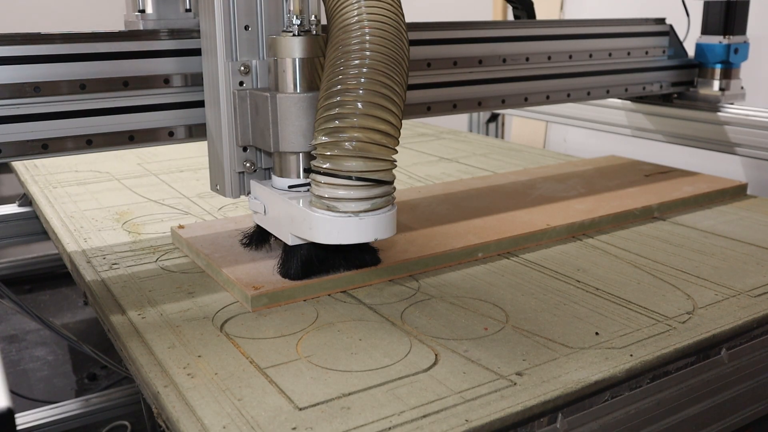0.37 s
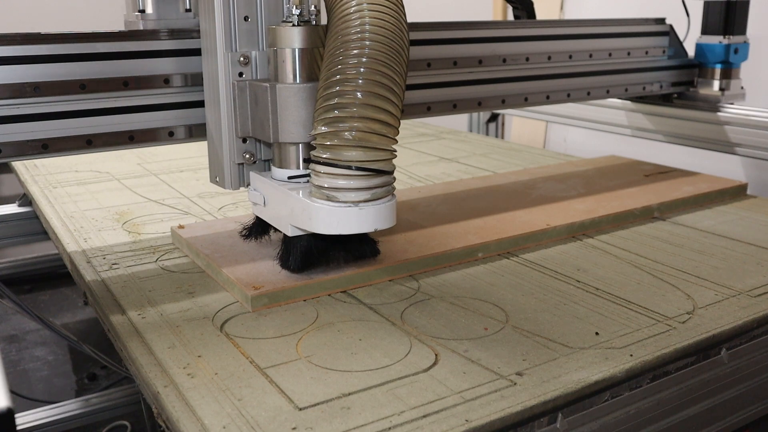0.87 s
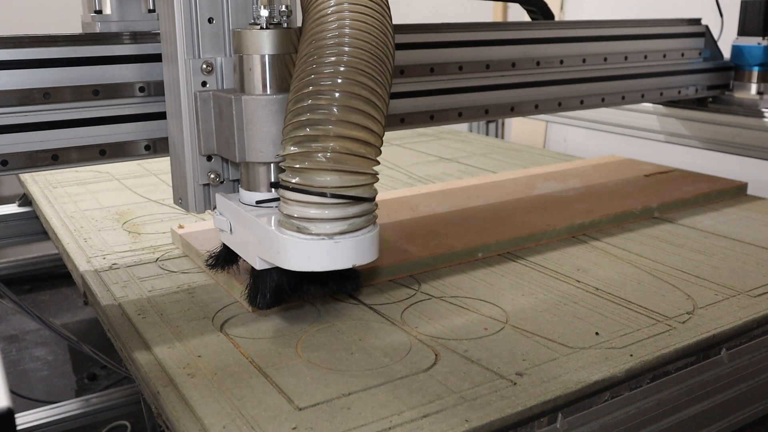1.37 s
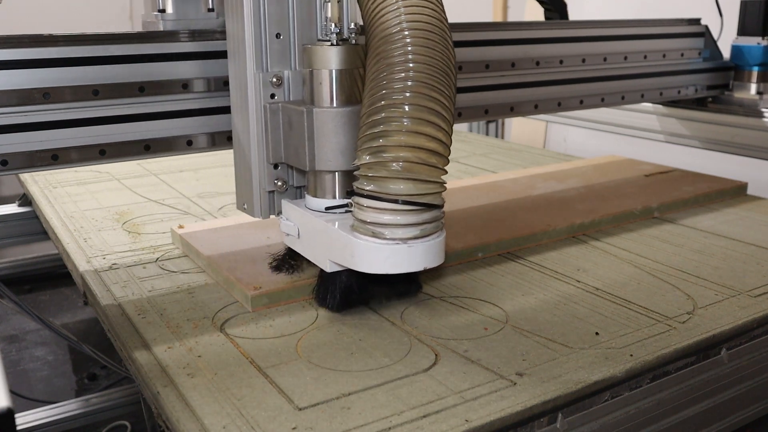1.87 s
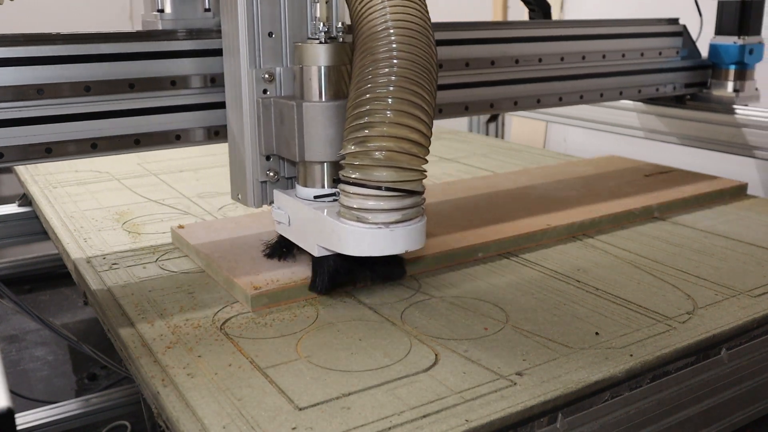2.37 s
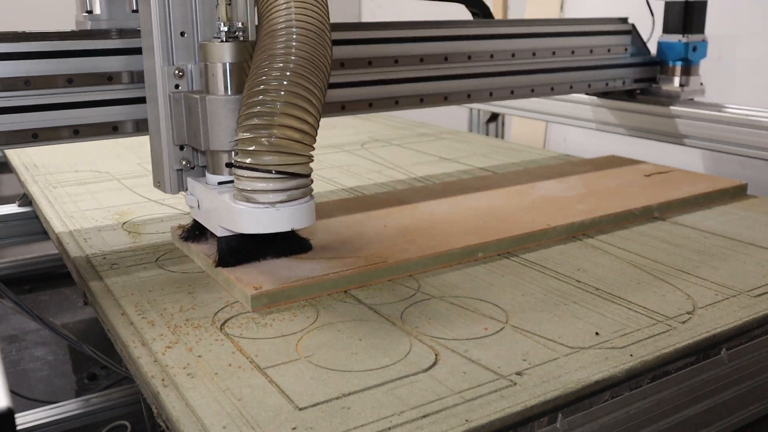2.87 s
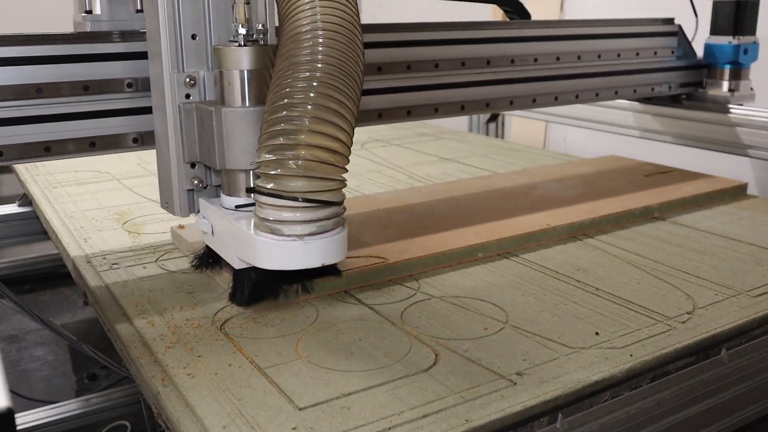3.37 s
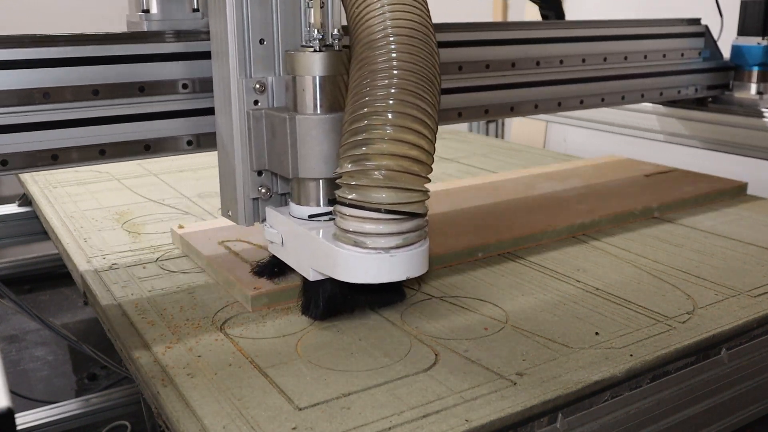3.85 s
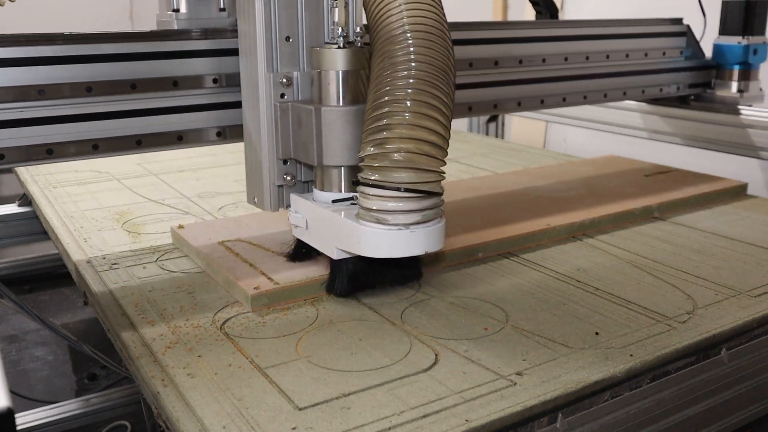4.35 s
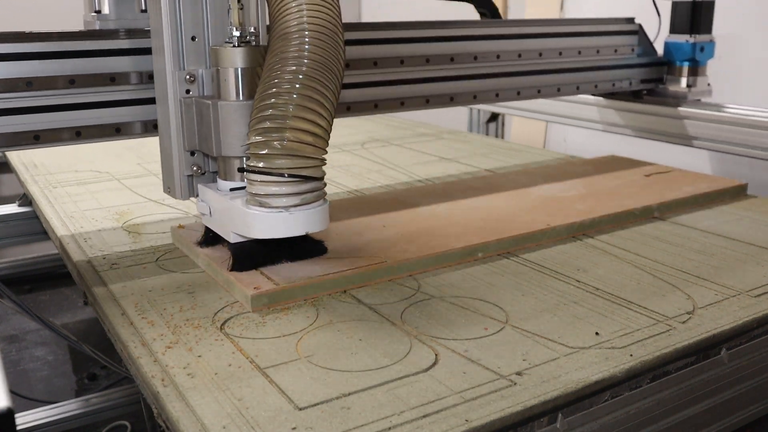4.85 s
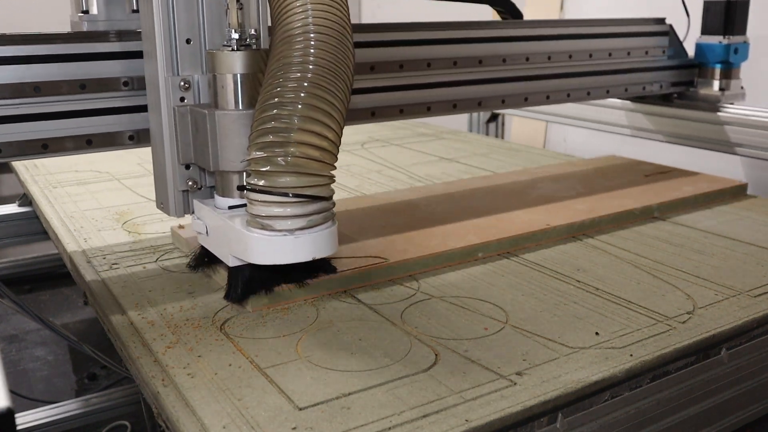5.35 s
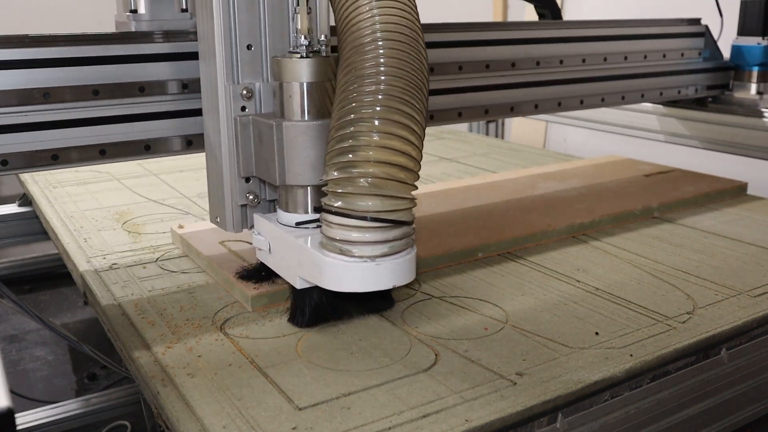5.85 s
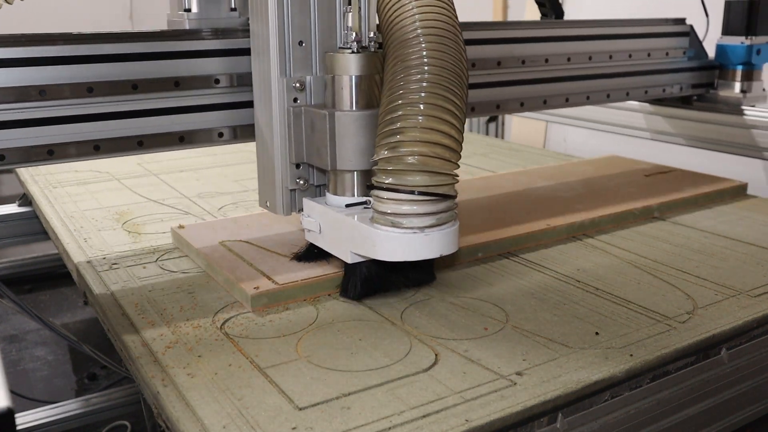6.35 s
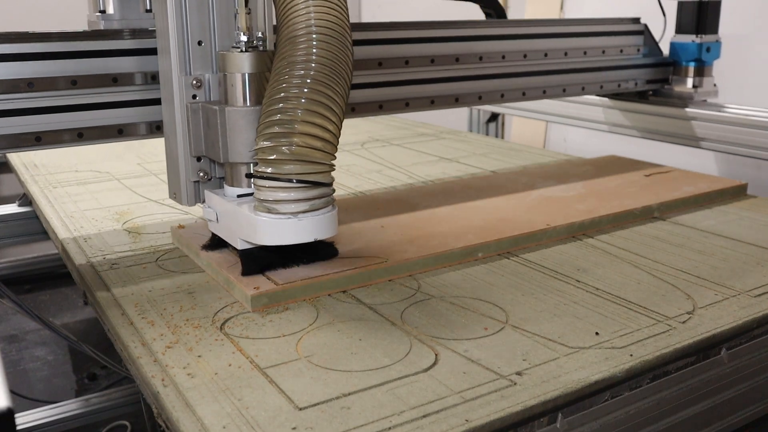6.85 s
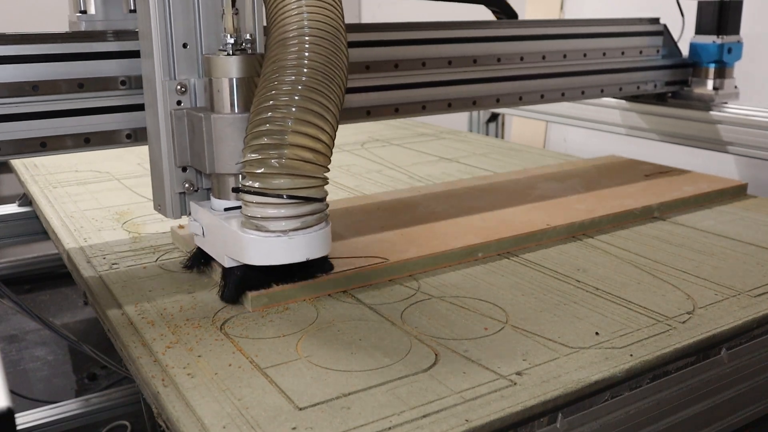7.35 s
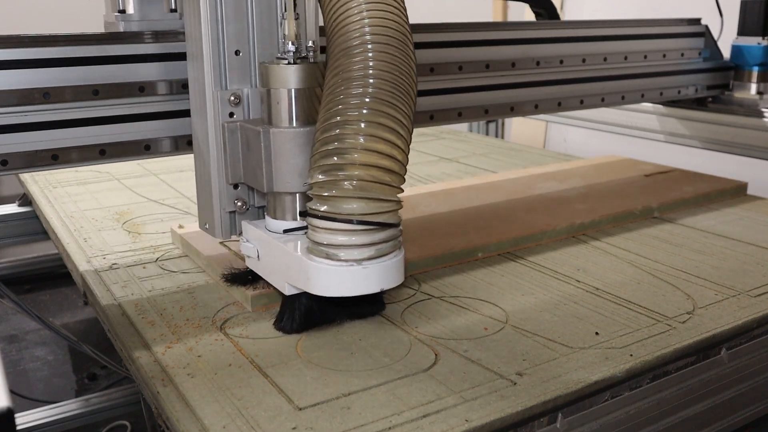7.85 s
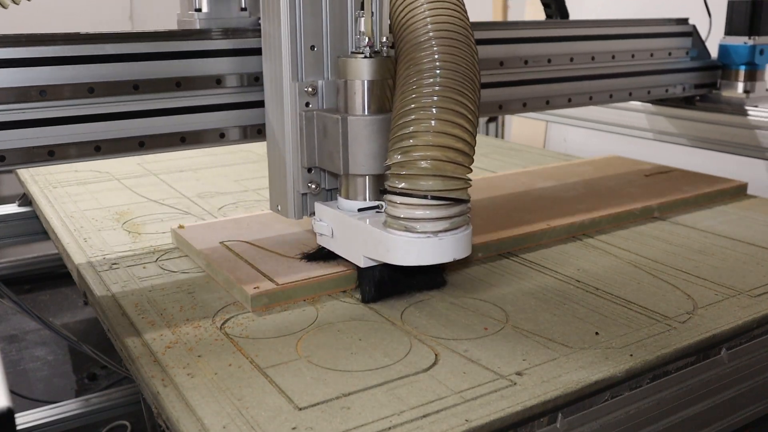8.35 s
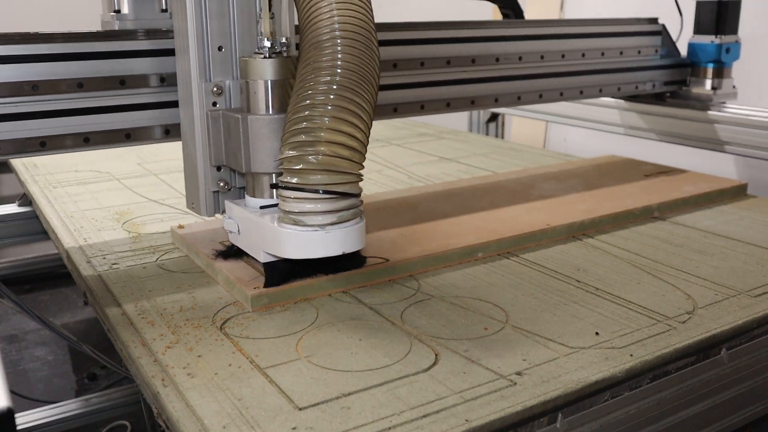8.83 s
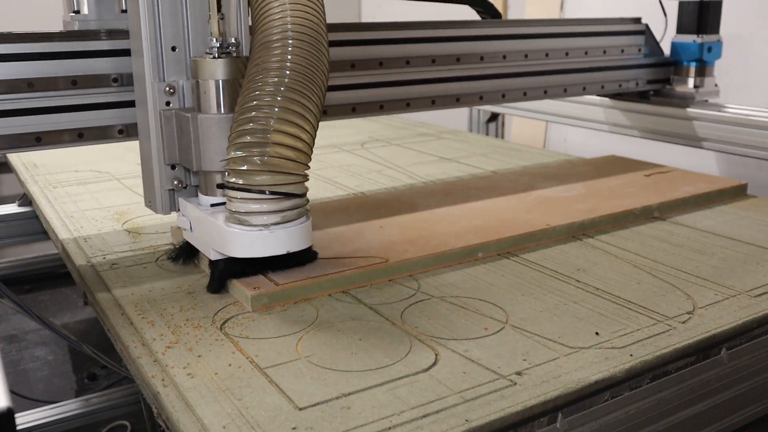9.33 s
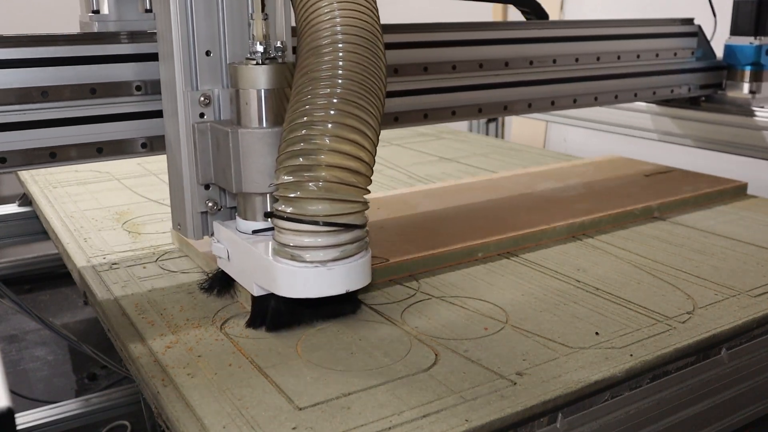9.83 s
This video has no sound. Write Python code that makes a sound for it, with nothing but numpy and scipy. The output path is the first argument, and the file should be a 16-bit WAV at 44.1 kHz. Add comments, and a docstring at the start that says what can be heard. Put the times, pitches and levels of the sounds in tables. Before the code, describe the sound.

A machine spindle whines high over a roaring dust extractor, then bites into wood with a harsh, beating scream that repeats lap after lap.

```python
"""Router cutting a wooden board

A router spindle runs free, plunges, then cuts lap after lap of an outline in a wooden board.
The loaded rotor lags behind the motor's magnetic field, so their steady sine whines beat together.
A dust extractor sings with blade tones and roars with shaped noise; axis motors chirp short notes.
More noise makes the air rush and the hiss of chips. The field whine and extractor drop as the cut begins."""
import sys
import numpy as np
from scipy import signal
from scipy.io import wavfile
from scipy.ndimage import uniform_filter1d

SR = 44100
rng = np.random.default_rng(int(sys.argv[2]) if len(sys.argv) > 2 else 0)


def materialize(psi):
    """Save the field psi as 16-bit PCM at rate SR to the path in sys.argv[1].

    A 1-D psi becomes a single channel; in a 2-D psi each row is a channel.
    """
    bounded = np.clip(np.atleast_2d(psi).T, -1, 1)
    quanta = np.round(bounded * 32767).astype(np.int16)
    wavfile.write(sys.argv[1], SR, quanta)


def gain_from_db(level_db):
    """Turn a decibel level (scalar or array-like) into a linear amplitude factor."""
    decades = np.asarray(level_db, float) / 20
    return 10 ** decades


N = 439216
T = np.arange(N) / SR  # time of each sample in seconds

# laps of the outline: start_s, feed_note_change_db, moves_until_s (s into the lap)
LAPS = [(1.68, -1, 2.05), (3.73, 0.5, 2), (5.78, 0, 2), (7.83, -3.5, 1.9)]
# halts, which also delay the rest of their lap: start_s, length_s, change_db, regained_turns, delay_s
HALTS = [(8.552, .04, -12, .7, .08), (8.632, .022, -5, 0, 0), (9.61, .085, -8, .7, .08)]


def evened(x):
    """Scales a signal to an rms of 1."""
    return x / np.sqrt(np.mean(x ** 2) + 1e-20)


def columns(rows):
    """Joins a table's points by straight lines: one value per sample for each column after the time."""
    s, *values = np.transpose(rows)
    return [np.interp(T, s, v) for v in values]


def drift(hz):
    """Slow random wandering of rms 1, changing about hz times a second."""
    # smoothed noise at 200 points a second; the first 100 let the smoothing settle
    points = signal.lfilter([1], [1, -np.exp(-2 * np.pi * hz / 200)], rng.standard_normal(2100))
    return np.interp(T, np.arange(2000) / 200, evened(points[100:]))


def tone(turns, db):
    """A sine of the given rms level, its phase counted in turns."""
    return np.sqrt(2) * gain_from_db(db) * np.cos(2 * np.pi * turns)


def air(points, lo_hz, hi_hz, patchy_db, flicker_db, ripple_db, peaks=(), size=1024):
    """Moving air as random short-time spectra, patchy and flickering, with rms 1 in the band lo-hi."""
    frame_count, hz = 4 * N // size + 5, np.fft.rfftfreq(size, 1 / SR)
    real, imaginary, patches = rng.standard_normal((frame_count, len(hz), 3)).T
    patches = uniform_filter1d(patches, size=12, axis=0)
    patches = evened(uniform_filter1d(patches, size=10, axis=1))
    flicker = evened(uniform_filter1d(rng.standard_normal(frame_count), size=5))
    point_hz, point_db = np.transpose(points)
    shape = gain_from_db(np.interp(np.log(hz + 1), np.log(point_hz + 1), point_db, -90, -90))
    for centre_hz, width_hz, top_db in peaks:
        shape *= 1 + (gain_from_db(top_db) - 1) / (1 + (2 * (hz - centre_hz) / width_hz) ** 2)
    shape *= gain_from_db(ripple_db * rng.standard_normal(len(hz)))  # room modes leave a fine, steady ripple
    moving_db = patchy_db * patches + flicker_db * flicker  # flicker is shared by all pitches
    spectra = (real + 1j * imaginary) * shape[:, None] * gain_from_db(moving_db)
    noise = signal.istft(spectra, nperseg=size, noverlap=3 * size // 4)[1][:N]
    band = (hz > lo_hz) & (hz < hi_hz)
    share = np.sqrt(np.sum(shape[band] ** 2) / np.sum(shape ** 2))
    return evened(noise) / share


def delayed(s):
    """Time of a lap move, pushed later by the halts before it."""
    for halt_s, *_, delay_s in HALTS:
        s += delay_s * (s > halt_s)
    return s


def lapped(before, lap, offset_db):
    """Follows one table until the cut, then repeats another on every lap with an offset added."""
    starts = np.array([row[0] for row in LAPS])
    # the lap clock stands still during each halt's delay
    clock = T - sum(np.clip(T - halt_s, 0, delay_s) for halt_s, *_, delay_s in HALTS)
    clock = clock - starts[np.maximum(np.searchsorted(starts, T) - 1, 0)]
    s, *values = np.transpose(lap)
    cutting = np.array([np.interp(clock, s, v) for v in values]) + offset_db
    return uniform_filter1d(np.where(T < before[-1][0], columns(before), cutting), size=500)


def freed():
    """Finds the level change in dB while the cutter is out of the wood, and the turns the rotor wins back."""
    # the cutter comes free for a moment: s_into_lap, length_s, change_db, regained_turns
    corners = [(.475, .045, -2.5, .45), (1.335, .034, -3, .45), (1.938, .095, -11.5, 0)]
    stops = [row[:-1] for row in HALTS]
    stops += [(delayed(lap[0] + s), *rest) for lap in LAPS for s, *rest in corners]
    change_db = sum(db * ((T > s) & (T < s + length_s)) for s, length_s, db, _ in stops)
    regained = sum(turns * (T > s + length_s / 2) for s, length_s, _, turns in stops)
    return uniform_filter1d(change_db, size=220), uniform_filter1d(regained, size=2600)


def extractor(roar_db):
    """Dust extractor: blade tones on a slightly wandering speed, over the roar of air in the hose."""
    # multiples of the blade pitch, one per blade tone
    blade_orders = [1, 2, 3, 4, 5, 8, 1 / 6]
    # average level of each blade tone over the roar (dB)
    blade_levels = [8.5, 2.5, -3.5, -27, -43, -45, -25.5]
    # colour of the roar: pitch_hz, relative_level_db
    roar_colour = [(40, -46), (90, -40.5), (160, -36), (300, -18.5), (500, -17.5), (650, -5.5), (900, 1.1),
                   (1300, -8), (1600, -5.5), (2200, -10), (3200, -16), (4500, -42)]
    # hose resonances and notches: pitch_hz, width_hz, height_db
    duct = [(692, 32, 6), (797, 33, -10), (828, 40, 4.5), (990, 26, -5.5), (1039, 22, 6.5), (1102, 57, -2),
            (1181, 24, 8), (1326, 96, -23), (1433, 61, 7.5), (1586, 31, -10), (2100, 110, -7.5),
            (2747, 58, 9)]
    blade_hz = 1779.8
    turns = blade_hz * T + np.cumsum(0.81 * drift(1.37)) / SR + 0.0071 * drift(25)
    blades = 0
    for k, db in zip(blade_orders, blade_levels):
        blades += tone(k * turns, roar_db + db + 1.03 * drift(3.9))
    thin = tone(14212 * T, roar_db - 19.5)  # a thin, steady high tone
    roar = gain_from_db(roar_db) * air(roar_colour, 550, 1285, 0.68, 0.46, 1.1, duct, size=2048)
    return blades + thin + roar


def feeds():
    """Axis motors: short sine notes with soft ends and one shared, unsteady level."""
    # notes on single moves: start_s, length_s, pitch_hz, average_level_db
    single_moves = [(.43, .14, 4000, -33), (1.22, .09, 1384, -26), (1.22, .09, 2767, -31),
                    (1.21, .1, 1529, -25), (1.21, .1, 3058, -32), (1.22, .085, 9179, -34),
                    (1.29, .06, 1044, -30), (1.3, .05, 2350, -35), (1.32, .06, 1604, -33),
                    (1.32, .06, 12000, -35), (1.4, .045, 12000, -37), (1.455, .21, 4000, -30),
                    (1.1, .4, 420, -50), (8.78, .07, 14950, -46)]
    # notes on every lap, before that lap's level change: s_into_lap, length_s, pitch_hz, level_db
    lap_moves = [(.03, .44, 6164, -46), (.03, .44, 5835, -55), (.6, .21, 3948, -39), (.9, .06, 1604, -38),
                 (.96, .09, 6896, -45), (1.04, .17, 6551, -46), (1.05, .16, 6980, -49),
                 (1.34, .62, 7138, -44.5), (1.4, .5, 5846, -52), (1.4, .5, 4075, -51), (1.4, .5, 4296, -49),
                 (.6, .2, 400, -60), (.47, .1, 430, -59), (1.24, .18, 412, -59), (1.4, .6, 420, -62),
                 (1.34, .62, 8920, -53), (.95, .2, 420, -63), (2.03, .04, 7250, -44), (.76, .06, 3860, -41),
                 (1.4, .5, 445, -66), (1.97, .07, 4000, -38)]
    notes = list(single_moves)
    for start_s, lap_db, until_s in LAPS:
        for s, length_s, hz, db in lap_moves:
            if s < until_s:
                notes.append((delayed(start_s + s), length_s, hz, db + lap_db))
    out, unsteady_db = np.zeros(N), 1.2 * drift(1.3)
    for s, length_s, hz, db in notes:
        t = np.arange(round(length_s * SR)) / SR
        soft_ends = signal.windows.tukey(len(t), min(.05 / length_s, .4))
        out[round(s * SR):][:len(t)] += tone(hz * t, db) * soft_ends
    return out * gain_from_db(unsteady_db)


def air_rush(rush_db):
    """Air through the brush skirt: patchy shaped noise."""
    # colour of the rush: pitch_hz, relative_level_db
    rush_colour = [(1200, 2), (2300, -2.5), (3000, -2), (4500, 0.5), (6000, -1), (8000, -6.5), (11000, -52)]
    return gain_from_db(rush_db) * air(rush_colour, 4230, 5660, 1.9, 0.67, 1.5)


def chip_hiss(hiss_db, free_db):
    """Chips leaving the cutter: high noise that eases a little when the cutter comes free."""
    # colour of the hiss: pitch_hz, relative_level_db
    hiss_colour = [(4000, -20), (7000, -4), (9000, 0), (10300, -.5), (11000, -2.5), (13200, -4),
                   (15000, -2.5), (15800, -5)]
    return gain_from_db(hiss_db + 0.29 * free_db) * air(hiss_colour, 9530, 17350, 2.2, 1.0, .8)


def lag(regained):
    """Turns by which the rotor whine trails the field whine; it falls behind faster under load."""
    # how fast the rotor falls behind: from_s, beats_per_second
    slip = [(0, 2), (1.55, 6.5), (1.73, 14.097), (3.58, 12.078), (5.51, 12.25), (6.31, 12.405),
            (7.84, 13.69), (8.71, 14.51), (9.08, 13.82)]
    s, rate = np.transpose(slip)
    beats = rate[np.searchsorted(s, T, "right") - 1]
    return -.2 + np.cumsum(beats) / SR - regained


def spindle(background_db, free_db, regained):
    """Field whine at a fixed pitch, tooth tones on the lagging rotor, and the tones they make together."""
    # free spin and plunge: time_s, then tooth orders 1, 2, 3 and 5 (level_db each)
    teeth_before = [(0, -44, -49, -37, -37), (1.2, -46, -45, -37.5, -37.5), (1.3, -50, -65, -36, -42),
                    (1.58, -36, -55, -47, -49), (1.63, -25, -37, -31, -32), (1.67, -26, -47, -35, -39),
                    (1.7, -37, -11, -42, -20)]
    # along one lap: s_into_lap, then tooth orders 1, 2, 3 and 5 over the extractor, before the bite (db each)
    teeth_lap = [(0, 14, 11, 4.8, 7), (.04, 12, 15.6, 6, 1.5), (.12, 14.7, 16.6, 4.9, 0),
                 (.43, 16.8, 16.4, 11, -6), (.465, 15, 18, 10.4, -8), (.5, 0.67, 18, 11.2, -16),
                 (.6, 9, 17.9, 6.7, 3), (.7, 11.4, 17.5, 6.5, 7.5), (.9, 14.3, 17, 7.9, 1.5),
                 (1.05, 12, 16.3, 7, -5), (1.2, 11.8, 15.2, 6.4, 1), (1.31, 17.6, 14.6, 3.4, -2),
                 (1.35, 12, 23, 9, -5), (1.4, 12.5, 19.8, 1.6, -0.5), (1.78, 4.3, 21.3, 1.2, -6),
                 (1.9, 1, 17.7, 1.7, 3.5), (1.96, 3.8, 12.7, 0.86, 7), (2.05, 12, 14.4, 2, 3)]
    # bite changing as laps go deeper: time_s, then change for tooth orders 1, 2, 3 and 5 (db each)
    bite = [(1.7, 0, 3, -1.5, 5.5), (2.2, -0.5, 0.23, 2.2, -2.5), (3.3, 2, 2.3, 2, 4),
            (3.6, -1, 0.7, .3, -2.5), (4.3, -1.5, -1.6, 1, 1.5), (5.5, .3, .3, -1, -5.5),
            (6, -0.7, -3.4, 0.8, 4.5), (7, -1.5, 0.75, -2, 1.5), (7.7, 1.8, -0.82, 3.7, -3.5),
            (8.2, 1, -0.81, 3, 4), (8.45, 0, 0.096, -0.5, 0), (9.08, -2.5, -1, 1.5, 3.5),
            (9.22, -3.5, 0.71, 10.5, 5), (9.27, 1.5, 0.051, -1, 2.5), (9.96, 6.5, -3.9, 6, -2)]
    # multiples of the field whine: multiple, db_to_the_whine (without its wobble)
    field_overtones = [(2, -23), (3, -29), (3.5, -24)]
    # whole tooth orders, then their sum and difference tones with the field:
    # tooth_order, field_order, tooth_column (0-3), db_to_that_column, wobble_db
    orders_mixed = [(1, 0, 0, 0, .6), (2, 0, 1, 0, .4), (3, 0, 2, 0, .6), (5, 0, 3, 0, 1.2),
                    (4, 0, 2, -11.5, 2), (6, 0, 1, -25, 2.5), (7, 0, 3, -8, 2.5), (1, 1, 1, -29, 3),
                    (2, 1, 1, -28, 2.5), (3, 1, 3, -2, 1.5), (4, 1, 1, -22, 2.5), (5, 1, 3, -9, 2.5),
                    (3, -1, 0, -21, 2), (4, -1, 1, -25, 2), (5, -1, 2, -19, 2)]
    # the drive's switching rate: time_s, average_pitch_hz
    switching = [(0, 15997), (7.75, 15997), (7.8, 16072), (8.4, 16075), (8.7, 16090), (9.96, 16090)]
    # tooth orders mirrored down from the switching rate: tooth_order, tooth_column, db_to_that_column
    mirrors = [(1, 0, -17.5), (2, 1, -28), (3, 2, -17.5), (4, 2, -24)]
    # drive tones under load: pitch_hz, tooth_column, db_to_that_column
    drive = [(11998, 1, -28), (14662, 0, -21)]

    tooth_db = lapped(teeth_before, teeth_lap, background_db + np.array(columns(bite))) + free_db
    field = 4199.15 * T  # the field's turns, from its pitch in Hz
    teeth = (field - lag(regained) + 0.018 * drift(30)) / 2  # second tooth order trails the field
    whine_db = background_db + 10.5
    out = tone(field + .47, whine_db + 1.07 * drift(2.8))
    for k, db in field_overtones:
        out += tone(k * field, whine_db + db)

    for k, m, column, db, wobble_db in orders_mixed:
        turns = k * teeth + m * (field + 0.022)
        if (k, m) == (3, 1):
            turns = turns + 0.53  # further lead of the sum tone beside the fifth order
        out += tone(turns, tooth_db[column] + db + wobble_db * drift(4))

    switch = np.cumsum(columns(switching)[0] + 3 * drift(3.96)) / SR
    for k, column, db in mirrors:
        mirror_db = tooth_db[column] + db + 2.4 * drift(3.1)
        out += tone(switch - k * teeth, mirror_db)
        if k > 1:  # a mirrored sum tone beats with the mirrored order
            out += tone(switch - (k - 2) * teeth - field + 0.32, mirror_db - 3.5)
    for hz, column, db in drive:
        out += tone(hz * T + 0.24 * drift(3.7), tooth_db[column] + db + 3.1 * drift(7.7))

    # chips of uneven size spread a skirt of noise around the second tooth order
    slow_noise = signal.butter(2, 280, fs=SR, output="sos")
    skirt = evened(signal.sosfilt(slow_noise, rng.standard_normal(N)))
    return out + skirt * tone(2 * teeth, tooth_db[1] - 23)


def scene():
    """Adds all sources at one point, most of them tied to the extractor's level."""
    # level of the extractor's roar, which other layers follow: time_s, level_db
    background = [(0, -29), (1.665, -28), (1.69, -38), (2.12, -41.5), (2.35, -40), (3.3, -42),
                  (3.55, -40.5), (3.76, -39.5), (4.61, -37), (5.1, -39.5), (5.55, -40), (5.72, -37.5),
                  (6.2, -39.5), (7.05, -40.5), (7.7, -38.5), (8.15, -43), (8.6, -44), (9.27, -42),
                  (9.61, -42), (9.96, -41.5)]
    # idle, rapid move and plunge: time_s, rush_over_extractor_db, chip_hiss_over_extractor_db
    air_before = [(0, -8.5, -7), (1.12, -10.5, -9.5), (1.15, -2.5, -1.5), (1.46, -3, -8.5), (1.49, -9, -11),
                  (1.57, -9, -9), (1.61, -5, -2), (1.68, -4, -3)]
    # along one lap: s_into_lap, rush_over_extractor_db, chip_hiss_db (over it before the softening below)
    air_lap = [(0, -1.5, -1.5), (.12, -3.5, 4.5), (.2, -3.5, 2), (.45, -3.5, 2), (.65, -2, 0), (1.2, -4, 1),
               (1.3, 2, .5), (1.37, -6, -1.5), (1.851, -5, 1.5), (1.95, -3.5, 2.5), (2.05, -2.5, 5.5)]
    roar_db, = columns(background)
    rush_db, hiss_db = roar_db + lapped(air_before, air_lap, 0)
    # in the cut the hiss takes only 0.45 of the level swings around -39 dB
    cutting = T > air_before[-1][0]
    hiss_db -= (1 - 0.45) * (roar_db + 39) * cutting
    free_db, regained = freed()
    mix = extractor(roar_db) + feeds() + air_rush(rush_db) + chip_hiss(hiss_db, free_db)
    mix += spindle(roar_db, free_db, regained)
    return np.array([mix, mix])


def top_cut(x):
    """Nothing passes above the cut-off."""
    return signal.sosfilt(signal.butter(12, 16730, fs=SR, output="sos"), x)


def record(dry):
    """One microphone feeds both channels; a steep low-pass filter ends the treble near 15740 Hz."""
    low_pass = signal.firwin(1023, 15740, window=("kaiser", 9), fs=SR)
    mix = signal.oaconvolve(dry, low_pass[None], "same")
    return top_cut(mix)


dry = scene()
out = record(dry)
materialize(out)
```